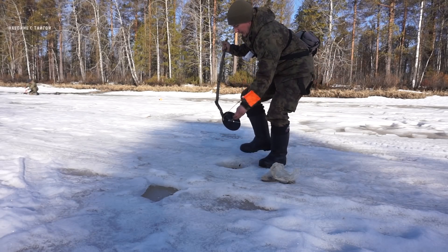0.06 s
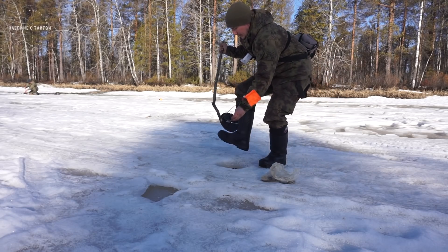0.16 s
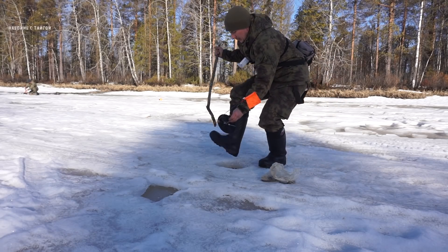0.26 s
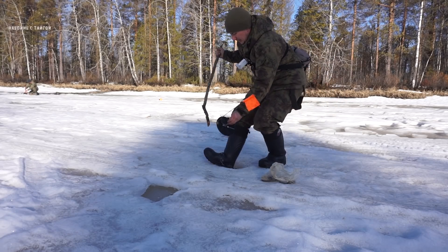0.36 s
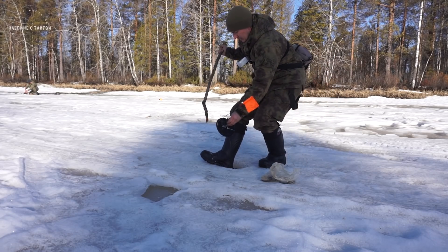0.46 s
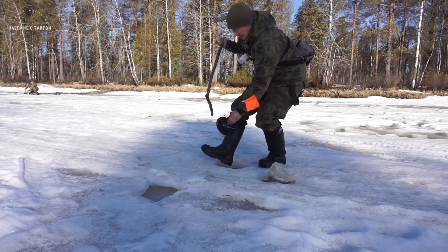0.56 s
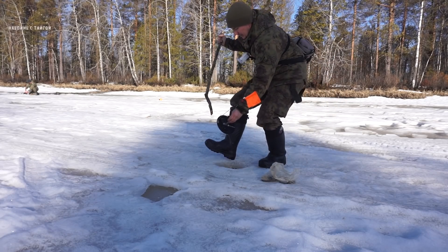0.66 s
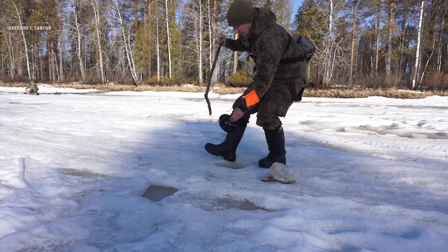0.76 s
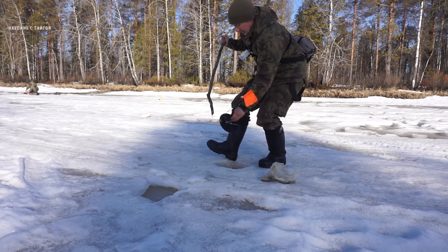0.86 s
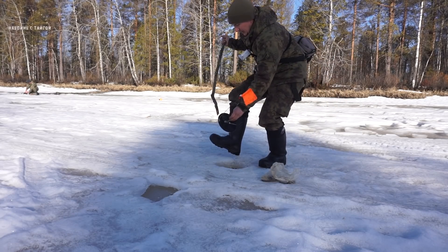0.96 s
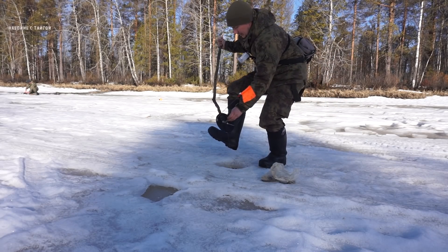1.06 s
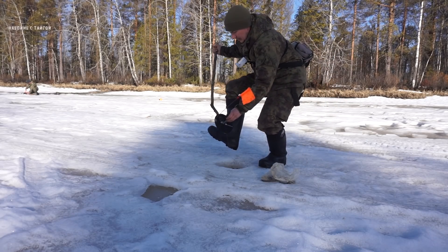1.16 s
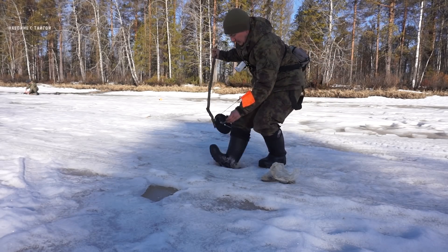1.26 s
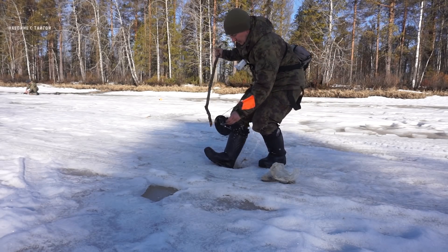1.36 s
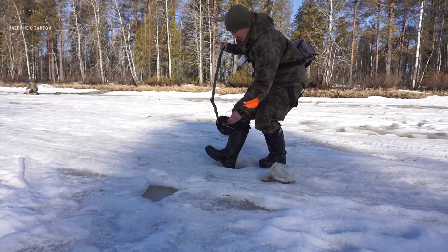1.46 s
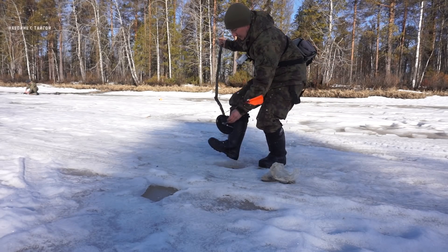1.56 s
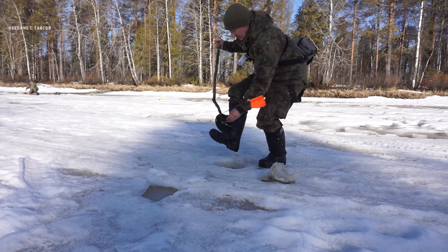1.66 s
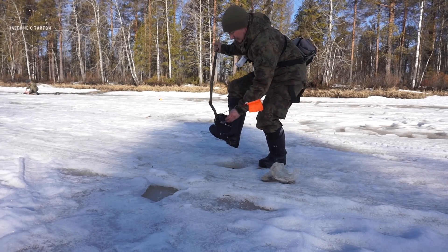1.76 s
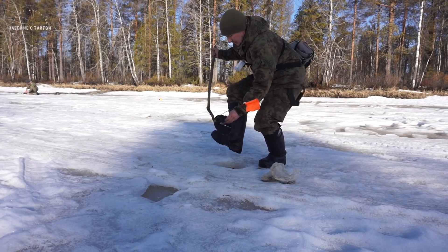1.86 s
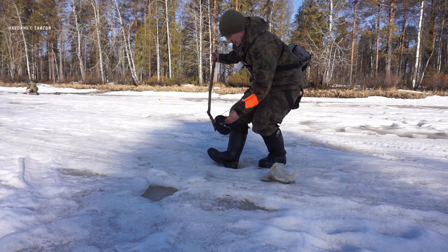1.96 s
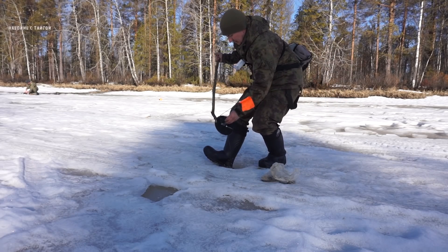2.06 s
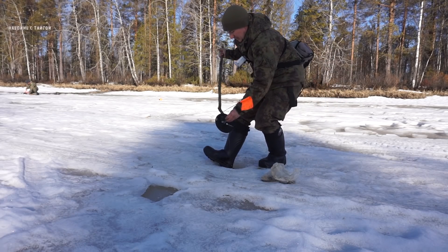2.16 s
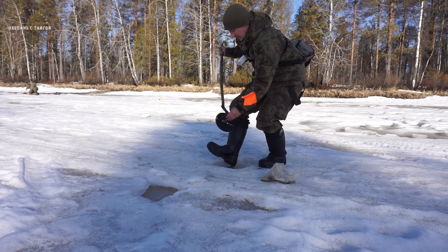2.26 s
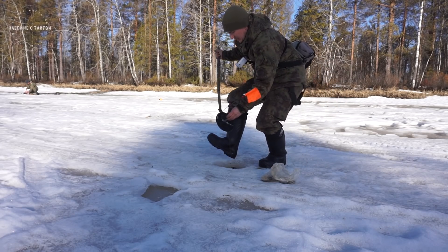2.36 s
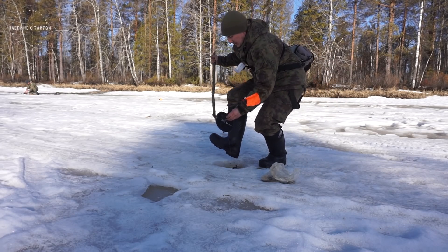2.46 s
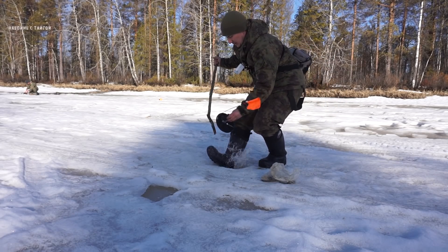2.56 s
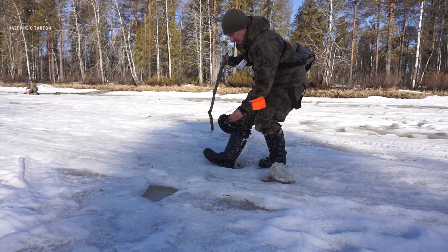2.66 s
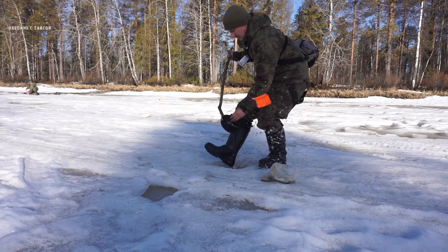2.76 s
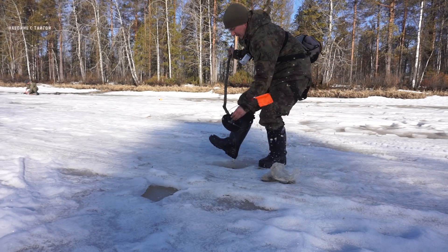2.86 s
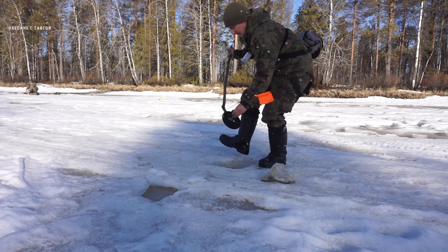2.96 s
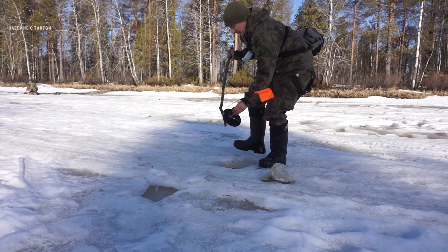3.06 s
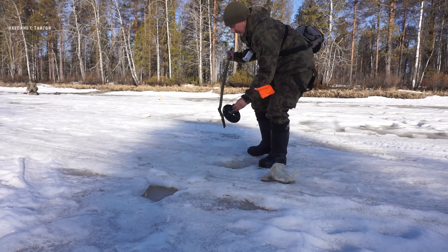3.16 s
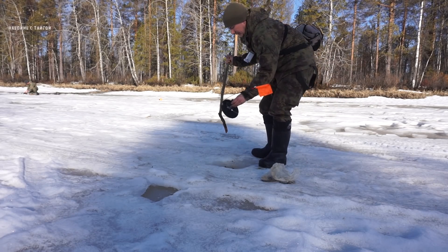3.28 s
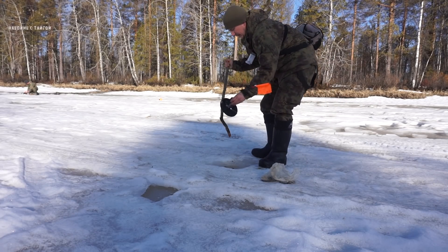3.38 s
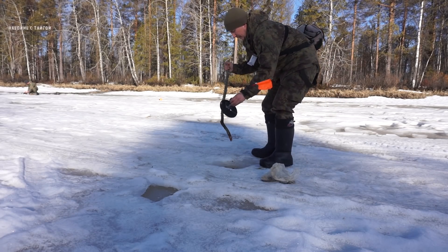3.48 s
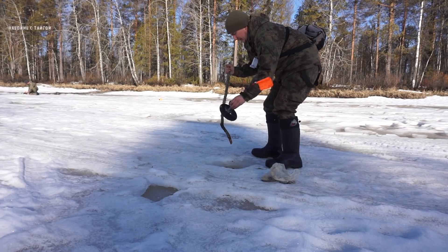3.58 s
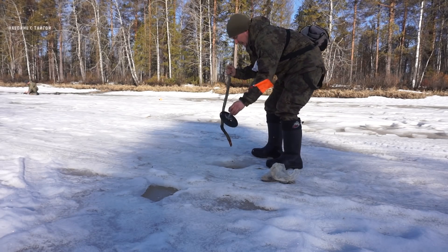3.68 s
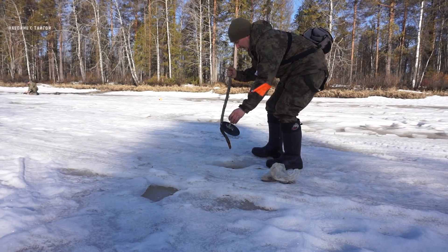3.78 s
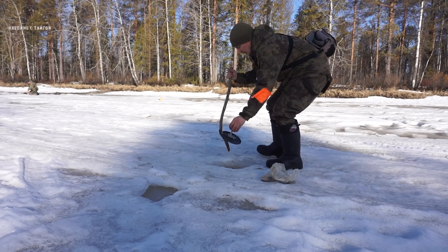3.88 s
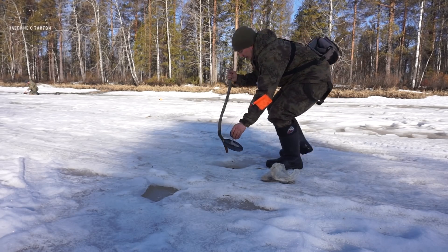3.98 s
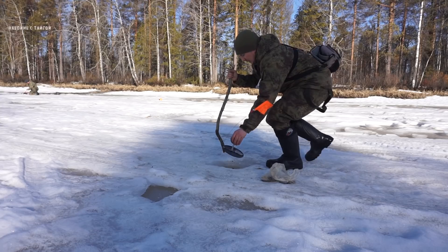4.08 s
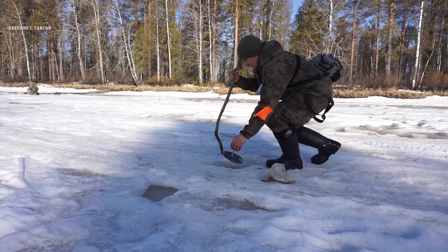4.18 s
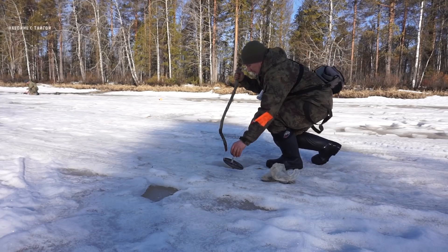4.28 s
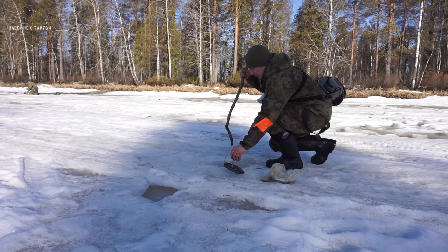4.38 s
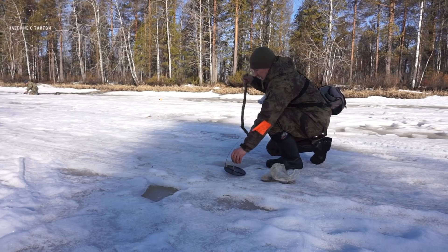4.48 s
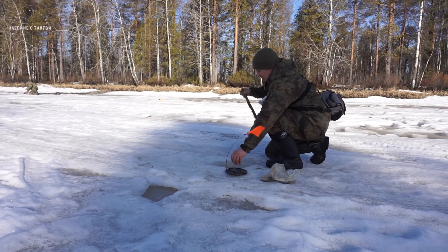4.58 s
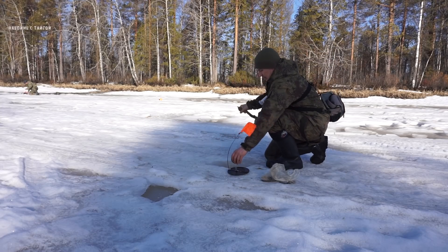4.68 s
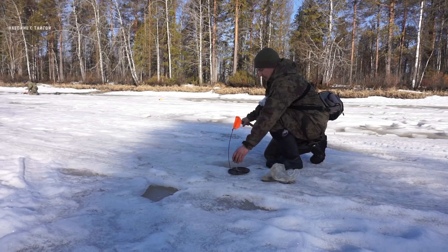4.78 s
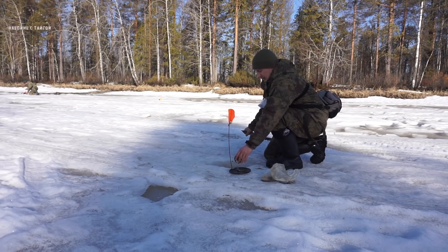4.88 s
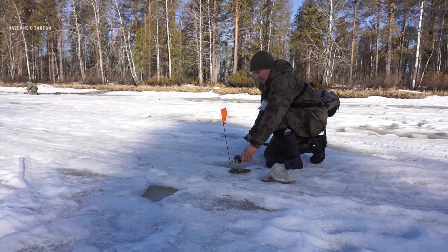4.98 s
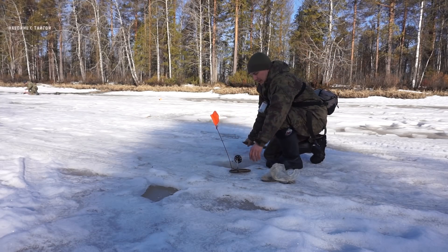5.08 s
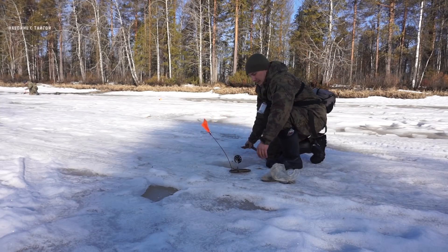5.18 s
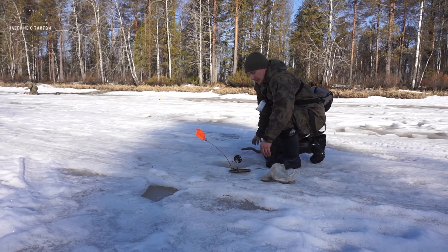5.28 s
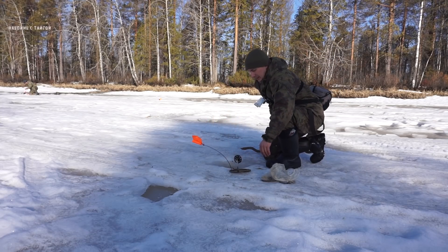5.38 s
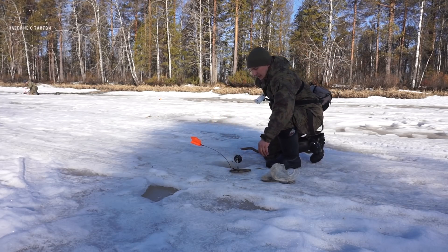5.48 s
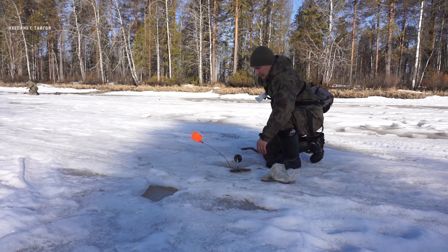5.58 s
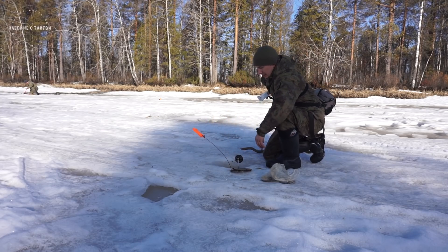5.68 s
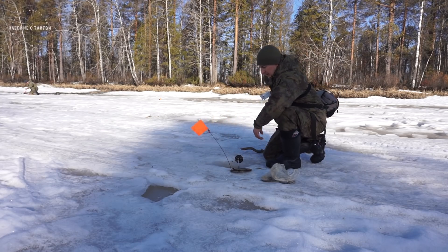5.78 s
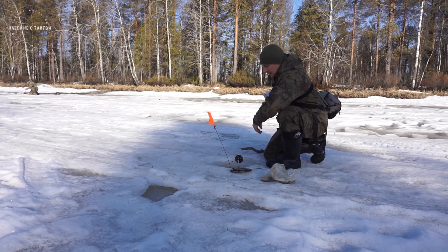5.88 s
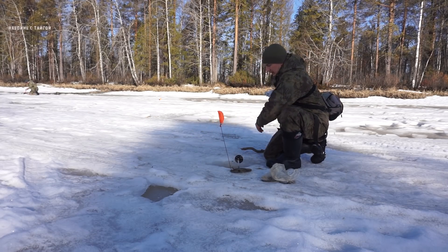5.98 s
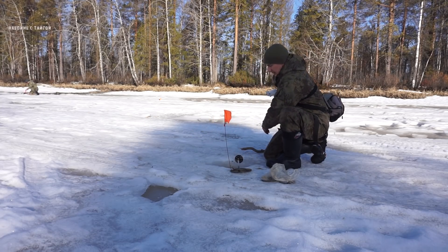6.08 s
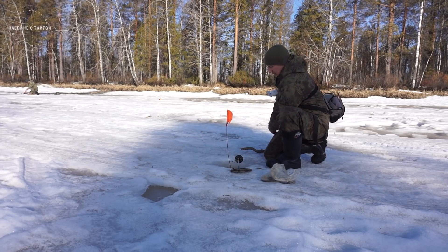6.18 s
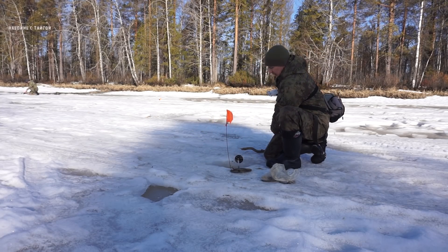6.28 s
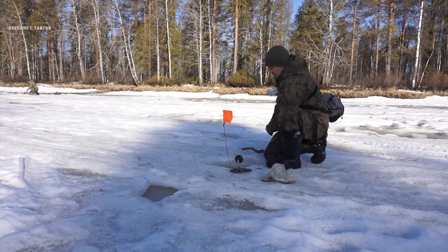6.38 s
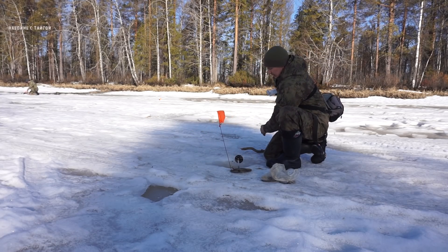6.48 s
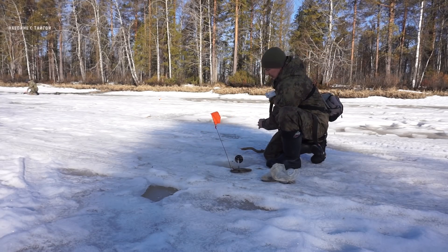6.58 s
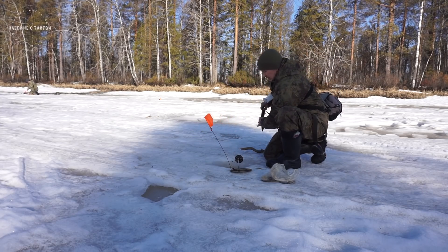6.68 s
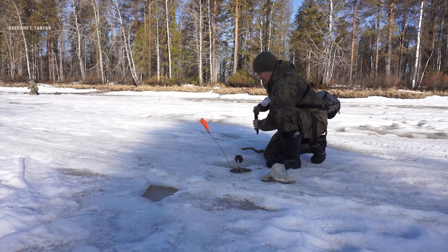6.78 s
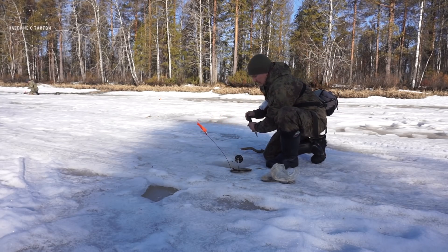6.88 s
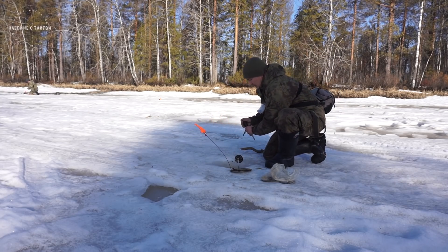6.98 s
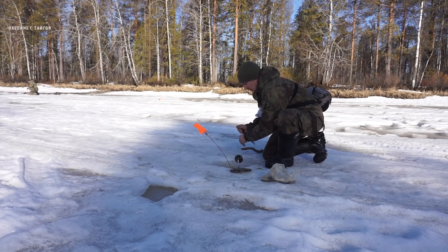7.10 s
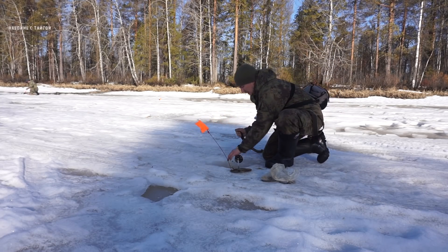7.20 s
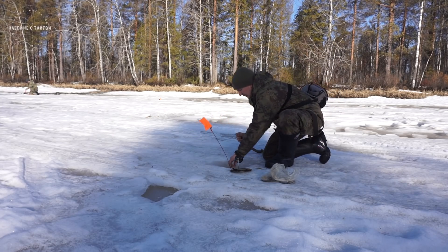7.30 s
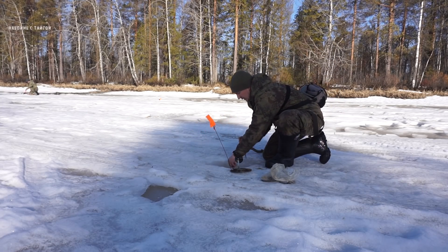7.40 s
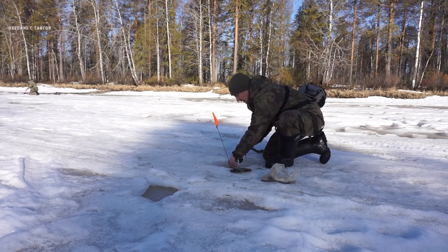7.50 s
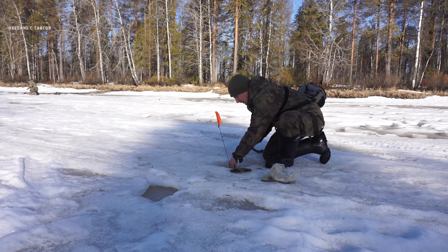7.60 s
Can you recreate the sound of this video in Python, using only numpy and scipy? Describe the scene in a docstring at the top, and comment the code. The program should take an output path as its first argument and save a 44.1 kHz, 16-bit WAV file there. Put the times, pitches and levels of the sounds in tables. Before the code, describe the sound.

Sharp icy knocks and gritty crunches outdoors, a brief flurry of metallic clinks, near quiet, then soft scraping of granular snow.

```python
"""Boot in river ice, small trap set down.

A boot stamps slush and crust out of a hole in river ice, a small fishing trap is set down and snow
is scraped round it. Crushes and loose snow are noise snaps through resonances; shards are noise
bursts with splinters. Wet ice chirps as gliding sines; trap and pin ring as decaying modes.
Below lie rumble and hiss of shaped noise, a wavering mains hum and two faint whines."""
import sys
import numpy as np
from scipy import signal
from scipy.fft import rfft, irfft
from scipy.io import wavfile
from scipy.ndimage import uniform_filter1d

SR = 44100
rng = np.random.default_rng(int(sys.argv[2]) if len(sys.argv) > 2 else 0)


def digitize_waveform(pressure):
    """Quantize a signal to 16-bit integers and store it at the path in sys.argv[1].

    Rows of a 2-D input are taken as channels; values are limited to [-1, 1].
    """
    field = np.atleast_2d(pressure).T
    bounded = np.clip(field, -1, 1)
    quanta = np.round(bounded * 32767).astype(np.int16)
    wavfile.write(sys.argv[1], SR, quanta)


N = 336924
T = np.arange(N) / SR


def undb(db):
    """Decibels to gain."""
    return 10 ** (np.asarray(db) / 20)


def level(x, db):
    """Scale to an rms level in dB."""
    return x * undb(db) / np.sqrt(np.mean(x ** 2))


def band(x, hz, width_hz):
    """Resonance with gain 1 at its centre."""
    return signal.lfilter(*signal.iirpeak(hz, hz / width_hz, fs=SR), x)


def steep(x, hz, width_hz):
    """The same resonance applied twice."""
    return band(band(x, hz, width_hz), hz, width_hz)


def fade(t, t60_s):
    """Exponential decay by 60 dB in t60_s, at least 2 ms."""
    return np.exp(-np.log(1000) * t / max(t60_s, .002))


def smooth_noise(count, width):
    """White noise under a moving average of width samples."""
    return uniform_filter1d(rng.standard_normal(count), size=width)


def add(out, start_s, x):
    """Mix a short sound in at a time."""
    i = max(int(start_s * SR), 0)
    out[i:i + len(x)] += x[:N - i]


# Background noise spectrum. Each row: frequency in Hz, relative density in dB per Hz.
AIR_SPECTRUM = [(12, 2), (20, 8.5), (60, -15.5), (98, -12), (127, -13.5), (499, -14.5), (759, -17),
                (1260, -18.5), (2080, -29), (4420, -31), (12800, -32), (16000, -35)]
AIR_DB = -52


def air():
    """Outdoor rumble and recorder hiss: white noise shaped in the frequency domain."""
    f = np.maximum(np.fft.rfftfreq(N, 1 / SR), 1)
    hz, db = np.transpose(AIR_SPECTRUM)
    shape = undb(np.interp(np.log(f), np.log(hz), db))
    return level(irfft(rfft(rng.standard_normal(N)) * shape, N), AIR_DB)


HUM_HZ, HUM_DB = 48.2, -50.5


def hum():
    """Mains hum: a sine whose phase drifts and whose level swells at random."""
    drift_rad = level(smooth_noise(N, SR // 15), -1.1)
    swell_db = level(smooth_noise(N, SR // 12), 9.1)
    return level(undb(swell_db) * np.sin(2 * np.pi * HUM_HZ * T + drift_rad), HUM_DB)


# Faint steady whines. Each row: centre in Hz, width in Hz, rms level in dB.
WHINE_BANDS = [(9700, 58.6, -75.5), (13000, 130, -74)]


def whines():
    """Noise through narrow resonances."""
    return sum(level(band(rng.standard_normal(N), hz, width_hz), db) for hz, width_hz, db in WHINE_BANDS)


# Chirps of air and wet ice. Each row: start in s, length in s, level in dB, first and last pitch in Hz.
CHIRP_EVENTS = [(1.423, 0.025, -46, 990, 1070), (1.741, 0.044, -48, 1777, 1660),
                (1.921, 0.015, -42, 970, 1050), (2.079, 0.023, -35.5, 1317, 1340),
                (2.842, 0.014, -42, 1640, 2130), (3.026, 0.022, -43, 1275, 1430),
                (3.051, 0.015, -31.5, 758, 935), (3.153, 0.0042, -33, 1020, 1074),
                (4.869, 0.02, -47.5, 1150, 1170), (4.905, 0.021, -43.5, 1180, 1160),
                (5.772, 0.055, -52.5, 1244, 1410), (5.865, 0.043, -58.5, 1600, 1830),
                (5.866, 0.013, -53, 2280, 2450), (5.958, 0.098, -63, 1850, 1930),
                (6.009, 0.042, -52, 1950, 2530), (6.032, .015, -54, 3030, 2650),
                (6.067, 0.061, -59, 2450, 2030), (7.398, 0.0085, -47, 1130, 1130),
                (7.417, 0.008, -42.5, 3570, 3520)]
CHIRP_ATTACK_S, CHIRP_T60_S = 0.0019, 0.025
CHIRP_WOBBLE = 0.042  # rms share of pitch
CHIRP_SWING_DB = 4.5  # rms


def chirps():
    """Short rough tones that glide unsteadily and break up as air squeezes out or ice rubs."""
    out, t = np.zeros(N), T[:SR // 6]
    for start_s, length_s, db, first_hz, last_hz in CHIRP_EVENTS:
        flutter, wobble = smooth_noise((2, len(t)), 60)
        pitch_wobble = CHIRP_WOBBLE * level(uniform_filter1d(wobble, size=150), 0)
        hz = np.interp(t, [0, length_s], [first_hz, last_hz]) * (1 + pitch_wobble)
        tone = np.sin(2 * np.pi * np.cumsum(hz) / SR)
        swing_db = CHIRP_SWING_DB * level(uniform_filter1d(wobble[::-1], size=300), 0)
        envelope = np.minimum(t / CHIRP_ATTACK_S, 1) * fade(np.maximum(t - length_s, 0), CHIRP_T60_S)
        add(out, start_s, undb(db + swing_db) * (1 + 3.6 * flutter) * envelope * tone)
    return out


def snaps(rate_hz, spread_db, smear_s):
    """Noise bursts at random times, uneven in size, each decaying with time constant smear_s."""
    size = undb(spread_db * np.minimum(rng.exponential(size=N), 4))
    hits = size * (rng.random(N) < rate_hz / SR)
    return signal.lfilter([1], [1, -np.exp(-1 / (smear_s * SR))], hits) * rng.standard_normal(N)


def grains(modes, rate_hz, spread_db, shared, smear_s):
    """Crushed grains at rms 1: every resonance hears common snaps and its own."""
    common = snaps(rate_hz, spread_db, smear_s)
    total = np.zeros(N)
    for hz, width_hz, db in modes:
        own = snaps(rate_hz, spread_db, smear_s)
        total += undb(db) * steep(shared * common + own, hz, width_hz)
    return level(total, 0)


# Crust resonances, also used by stamps. Each row: centre in Hz, width in Hz, gain in dB.
COARSE_MODES = [(360, 220, 3.5), (633, 960, 7.5), (1246, 840, 2.5), (2094, 2360, 3), (2865, 2500, -2)]
# Fine grain resonances, also used by stamps. Each row: centre in Hz, width in Hz, gain in dB.
FINE_MODES = [(4250, 4100, 5), (6840, 4230, 8), (10750, 9000, 3.5)]
# Loose snow shifting. Each row: time in s, gain of coarse grains in dB, gain of fine grains in dB.
SHUFFLE_LEVELS = [(0, -65.5, -67), (1.28, -60.5, -65), (1.5, -48, -51.5), (1.9, -65, -50.5),
                  (2.13, -48.5, -58), (2.36, -55.5, -59.5), (2.55, -61, -63), (2.72, -45.5, -51),
                  (3.15, -53, -47.5), (3.6, -58.5, -61.5), (3.9, -48.5, -59), (4.05, -55, -61.5),
                  (4.7, -48.5, -54.5), (5.05, -62, -72), (6.05, -57, -56.5), (6.25, -68, -73),
                  (6.8, -65.5, -71), (7.11, -41.5, -58), (7.16, -50.5, -57), (7.4, -59, -65)]


def plinks():
    """Wet bits: 260 tiny sines at random times and pitches, rising slightly as they die."""
    out, t = np.zeros(N), T[:SR // 25]
    for when, pitch, size in rng.random((260, 3)):
        hz = 600 * 7 ** pitch
        tone = np.sin(2 * np.pi * hz * t * (1 + 1.6 * t))
        add(out, when * N / SR, 5.0 * size ** 2 * fade(t, 35 / hz) * tone)
    return out


def shuffle():
    """Sparse crackle of loose crumbs over a soft rustle of dense grains, with wet plinks."""
    time_s, coarse_db, fine_db = np.transpose(SHUFFLE_LEVELS)
    coarse = grains(COARSE_MODES, 40, 3.5, 0.098, 0.0096)
    coarse += 0.31 * grains(COARSE_MODES, 1200, 2.0, 0.16, 0.002)
    fine = grains(FINE_MODES, 45, 3.5, .2, .0013)
    fine += .6 * grains(FINE_MODES, 1200, 1.7, .1, .0013)
    coarse_gain = undb(np.interp(T, time_s, coarse_db))
    fine_gain = undb(np.interp(T, time_s, fine_db))
    return coarse_gain * (coarse + plinks()) + fine_gain * fine


STRIKE_DB, STRIKE_T60_S = -2, 0.008  # broad tick of metal on metal


def ring(modes, scatter_db):
    """A blow excites the modes unevenly, slightly off pitch; loose contact roughens the ring."""
    t = T[:SR // 4]
    x = np.zeros(len(t))
    for hz, db, t60_s in modes:
        gain = undb(db + scatter_db * rng.standard_normal())
        mode_hz = hz * (1 + 0.0069 * rng.standard_normal())
        x += gain * fade(t, t60_s) * np.sin(2 * np.pi * mode_hz * t)
    x *= 1 + 1.5 * smooth_noise(len(t), 60)
    tick = band(rng.standard_normal(len(t)), 5800, 6100) * fade(t, STRIKE_T60_S)
    return x / np.max(np.abs(x)) + undb(STRIKE_DB) * tick


# Modes of the loose steel pin. Each row: frequency in Hz, relative level in dB, t60 in s.
PIN_MODES = [(4336, 15, 0.037), (4426, 3, 0.14), (10140, 2.5, 0.034), (12150, -1.5, 0.13)]
# Pin rattling by itself. Each row: start in s, stop in s, mean level in dB.
PIN_CHATTER = [(.64, .74, -53), (4.453, 4.87, -51), (5.13, 5.44, -50.5), (5.601, 5.825, -54),
               (5.938, 6.03, -45.5)]
# Pin struck. Each row: start in s, level in dB.
PIN_STRIKES = [(0.0922, -36.5), (4.383, -36), (4.53, -34.5), (4.6304, -30), (4.69, -34), (4.7334, -28),
               (4.808, -39.5), (4.936, -41), (5.0625, -44.5), (5.3416, -42), (5.36, -38), (5.195, -46),
               (5.7975, -43), (5.917, -36), (5.955, -42)]


def pin():
    """Loose steel pin: single strikes, and rattles of uneven blows about every 16 ms."""
    out = np.zeros(N)
    for start_s, stop_s, db in PIN_CHATTER:
        for s in np.arange(start_s, stop_s, .016):
            blow_db = db + 3.5 * rng.standard_normal()
            add(out, s + .02 * rng.random(), undb(blow_db) * ring(PIN_MODES, 5))
    for start_s, db in PIN_STRIKES:
        add(out, start_s, undb(db) * ring(PIN_MODES, 4))
    return out


# Modes of the trap's plate. Each row: frequency in Hz, relative level in dB, t60 in s.
PLATE_MODES = [(2260, -9, 0.082), (2480, -4.5, 0.093), (4590, 11, 0.032), (7970, 17, 0.014),
               (8370, 15, 0.024), (13700, -1, 0.018)]
# Modes of the hook. Each row: frequency in Hz, relative level in dB, t60 in s.
HOOK_MODES = [(3040, -2, 0.03), (5810, 15, 0.035), (9200, 4, 0.03), (10500, -4, 0.015), (12000, -1, 0.034)]
# Trap parts knocking. Each row: start in s, level in dB, gain of the hook's modes in dB.
TRAP_CLINKS = [(4.3702, -14, -23), (4.3926, -18, -5), (4.411, -11, 7), (4.4354, -26, 2), (4.44, -29, 8),
               (4.4613, -32, 0), (4.477, -34, 12), (4.4858, -21.5, 16), (4.563, -30, -6)]


def trap():
    """Knocks of the trap: plate and hook modes ring together in varying balance."""
    out = np.zeros(N)
    for start_s, db, hook_db in TRAP_CLINKS:
        hook = [(hz, mode_db + hook_db, t60_s) for hz, mode_db, t60_s in HOOK_MODES]
        add(out, start_s, undb(db) * ring(list(PLATE_MODES) + hook, 2.5))
    return out


# Single shards. Each row: start in s, peak of body in dB, pitch in Hz, peak of treble tick in dB.
SHARDS = [(.292, -30.5, 980, -28.5), (0.331, -28, 1760, -45), (0.343, -24.5, 1500, -33),
          (.407, -11, 1050, -29), (0.426, -13, 820, -36), (0.512, -22, 1630, -47), (.818, -9, 2200, -36),
          (1.029, -30.5, 880, -38), (1.366, -14.5, 980, -38), (1.389, -32, 510, -24.5),
          (1.505, -34.5, 477, -31), (1.714, -56, 455, -26.5), (1.869, -35, 3860, -31),
          (2.07, -12, 1590, -31), (2.187, -30.5, 620, -35), (2.382, -33.5, 1200, -51),
          (2.424, -29, 2120, -55), (2.587, -3.5, 657, -31), (2.703, -20, 2750, -47),
          (2.724, -23, 1730, -39), (2.97, -33.5, 2130, -27), (3.013, -32, 1360, -50),
          (3.207, -47, 3830, -22), (3.243, -15, 2210, -46), (3.328, -34, 1100, -54), (3.368, -42, 554, -24),
          (3.413, -7, 1020, -30), (3.471, -27, 1250, -52), (3.493, -22, 600, -28), (3.525, -21.5, 755, -48),
          (3.546, -26, 685, -34), (3.571, -35, 900, -40), (3.656, -23, 760, -40), (3.667, -26, 1800, -45),
          (3.689, -21.5, 1390, -48), (3.726, -24.5, 546, -55), (3.742, -38, 800, -43),
          (3.755, -21.5, 1180, -36), (3.784, -26.5, 1490, -40), (3.823, -29, 1000, -34),
          (3.838, -21.5, 1430, -53), (3.865, -22, 730, -53), (3.907, -29, 430, -29),
          (3.953, -34.5, 1100, -53), (3.987, -29.5, 1040, -57), (4.112, -20, 1020, -43),
          (4.127, -23, 970, -36), (4.177, -35.5, 735, -23), (4.417, -26, 3050, -45),
          (4.495, -25, 1160, -32), (4.62, -24, 1380, -26), (4.655, -26.5, 1510, -26),
          (4.712, -23.5, 1220, -30), (4.8, -27.5, 930, -33), (4.857, -26, 1050, -33),
          (4.96, -26.5, 1260, -27), (4.988, -37, 1340, -29), (5.077, -34.5, 1120, -50),
          (5.238, -32.5, 2440, -56), (5.282, -18.5, 875, -47), (5.306, -24, 2550, -47),
          (5.483, -38.5, 286, -60), (5.609, -31.5, 2180, -46), (5.749, -23, 1930, -59),
          (5.833, -26, 550, -24), (5.935, -34.5, 1900, -48), (6.312, -37, 1950, -36),
          (6.855, -47, 1500, -36), (6.88, -30.5, 600, -23.5), (6.963, -28.5, 394, -50),
          (7.023, -24, 840, -28), (7.101, -29, 1590, -22.5), (7.185, -35, 1580, -23),
          (7.204, -30, 1700, -24), (7.269, -17.5, 1710, -28), (7.294, -27, 2000, -24.5),
          (7.358, -28, 1900, -38)]
SPLINTER_DB, SPLINTER_DB_PER_DB = -5.5, -0.62  # top size at a -26.5 dB shard; hard shards snap cleaner
SPLINTER_MAX_S, SPLINTER_T60_S = .016, 0.0069  # latest lag; decay
OVERTONE_RATIO, OVERTONE_DB = 2.36, -13


def cracks():
    """A sharp snap rings a few cycles in the shard, three splinters follow; a treble tick rides on it."""
    out, t = np.zeros(N), T[:SR // 12]
    for start_s, db, hz, treble_db in SHARDS:
        rough, hiss = rng.standard_normal((2, len(t)))
        rough[0] += 2.5  # initial snap
        breaks = fade(t, 0.0016) + 0.16 * fade(t, 0.033)
        splinter_gain = undb(SPLINTER_DB + SPLINTER_DB_PER_DB * (db + 26.5))
        for lag, size in rng.random((3, 2)):
            since_s = t - SPLINTER_MAX_S * lag ** 2
            breaks += splinter_gain * size * (since_s > 0) * fade(np.abs(since_s), SPLINTER_T60_S)
        snap = rough * breaks
        body = steep(snap, hz, 1.23 * hz) + undb(OVERTONE_DB) * steep(snap, OVERTONE_RATIO * hz, hz)
        tick = steep(hiss * breaks * fade(t, 0.042), 4500, 7300)
        body_out = undb(db) * body / np.max(np.abs(body))
        add(out, start_s, body_out + undb(treble_db) * tick / np.max(np.abs(tick)))
    return out


# Boot or hand crushing crust. Each row: start in s, crushing time in s, body gain in dB,
# body centre in Hz, treble gain in dB.
CRUSHES = [(.002, 0.0061, -18, 1170, -30.5), (0.019, 0.013, -35, 1520, -44), (0.04, 0.0087, -28, 1310, -43),
           (.29, 0.2, -43.5, 1270, -47.5), (0.37, 0.017, -10, 720, -19.5), (0.401, 0.019, -17, 1030, -32),
           (.43, 0.066, -38.5, 1140, -58), (0.508, 0.035, -34, 1560, -44), (.767, 0.044, -28, 2310, -36),
           (1.291, 0.019, -7, 1130, -23), (1.321, 0.024, -25.5, 730, -38.5),
           (1.974, 0.011, -10.5, 460, -24), (1.985, 0.03, -27, 900, -38), (2.032, 0.042, -27, 1120, -43),
           (2.064, 0.015, -24.5, 1120, -31.5), (2.564, 0.019, -10, 1010, -21),
           (2.592, 0.045, -21, 770, -32.5), (2.641, 0.028, -32.5, 1160, -36),
           (3.089, 0.042, -37.5, 2500, -37.5), (3.249, 0.012, -22.5, 1000, -36.5),
           (3.294, 0.0063, -21.5, 1080, -34.5), (3.637, 0.0037, -22, 402, -43.5),
           (4.123, 0.135, -45, 1220, -44), (4.162, 0.0056, -32, 236, -57), (4.492, 0.028, -40.5, 1380, -41),
           (4.701, 0.054, -37, 1240, -43.5), (5.264, 0.077, -44, 1160, -54), (5.72, 0.034, -39, 1010, -53),
           (6.9, 0.155, -39.5, 830, -47.5), (7.05, 0.092, -38.5, 1530, -39.5),
           (7.171, 0.085, -31.5, 1760, -34), (7.263, 0.097, -34, 1740, -38),
           (7.415, 0.014, -45, 3600, -35.5)]
BITE_S, BITE_SHARE, RELEASE_T60_S = 0.0049, 0.071, 0.035  # rise, plus a share of crushing time; stop
SETTLE_DB, SETTLE_T60_S = -24, 0.37
THUD_DB, THUD_DB_PER_OCTAVE = -13.5, -1  # re body gain, at a 1 kHz centre; deeper crushes thud more
BRIGHTEN_RATIO = 1.96  # a higher band grows in during dense crushes


def stamps():
    """Crust gives way, crumbs settle; hard blows are dense, light ones break into separate crackles."""
    out = np.zeros(N)
    dense_coarse = grains(COARSE_MODES, 450, 7.0, 0.95, 0.00075)
    dense_fine = grains(FINE_MODES, 600, 2.3, 0.56, 0.00097)
    sparse_coarse = grains(COARSE_MODES, 110, 2.3, 0.86, 0.0017)
    sparse_fine = grains(FINE_MODES, 130, 6.7, 1.44, 0.00064)
    thud = level(steep(rng.standard_normal(N), 232, 544), 0)
    for start_s, hold_s, db, hz, treble_db in CRUSHES:
        first = max(int(start_s * SR), 0)
        i = slice(first, first + SR // 3)
        t = T[:len(out[i])]
        progress = np.clip(t / hold_s, 0, 1)
        bite = np.minimum(t / (BITE_S + BITE_SHARE * hold_s), 1)
        crush = bite * fade(np.maximum(t - hold_s, 0), RELEASE_T60_S)
        settle = undb(SETTLE_DB) * progress * fade(t, SETTLE_T60_S)

        dense = np.clip((db + 45) / 25, .3, 1)
        sparse = np.sqrt(1 - dense ** 2)
        grit = dense * dense_coarse[i] + sparse * sparse_coarse[i]
        body = steep(grit, hz, 1.24 * hz)
        bright_hz = BRIGHTEN_RATIO * hz
        body += dense ** 2 * progress * steep(grit, bright_hz, bright_hz)
        body = body * crush + band(sparse_coarse[i], hz, 1.4 * hz) * settle

        top_hz = np.clip(5998 + 200 * (treble_db + 33.5), 4000, 12000)  # harder blows shatter finer
        dust = dense * dense_fine[i] + sparse * sparse_fine[i]
        top = steep(dust, top_hz, 7400) * crush + band(sparse_fine[i], top_hz, 6100) * settle

        thud_db = db + THUD_DB + THUD_DB_PER_OCTAVE * np.log2(hz / 1000)
        low = undb(thud_db) * thud[i] * (crush + settle)
        out[i] += undb(db) * body + undb(treble_db) * top + low
    return out


def scene():
    """Open ice: all sources dry, one channel."""
    background = air() + hum() + whines()
    return (background + chirps() + shuffle() + pin() + trap() + cracks() + stamps())[None]


TOP_HZ, EDGE_HZ = 15900, 16700


def record(dry):
    """The recorder rounds the loudest peaks and cuts the top with two low-passes."""
    soft = np.tanh(1.5 * dry) / 1.5
    soft = signal.sosfilt(signal.ellip(6, .2, 25, TOP_HZ, fs=SR, output="sos"), soft)
    return signal.sosfilt(signal.ellip(10, .2, 80, EDGE_HZ, fs=SR, output="sos"), soft)


dry = scene()
out = record(dry)
digitize_waveform(out)
```